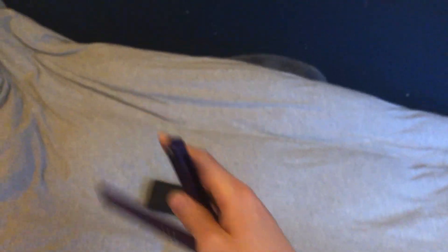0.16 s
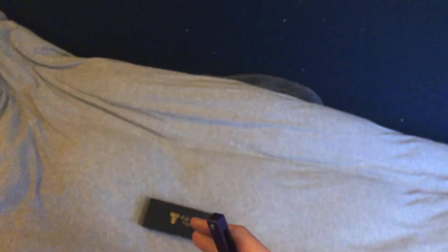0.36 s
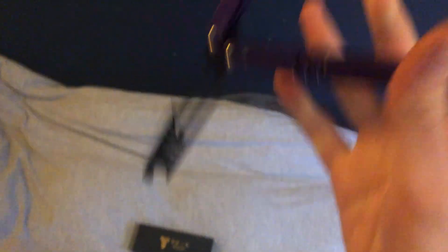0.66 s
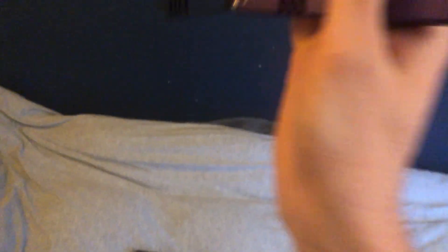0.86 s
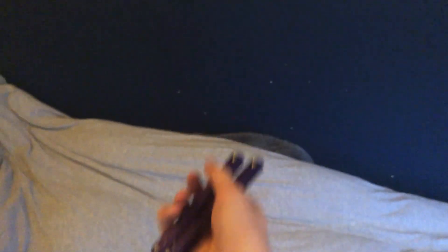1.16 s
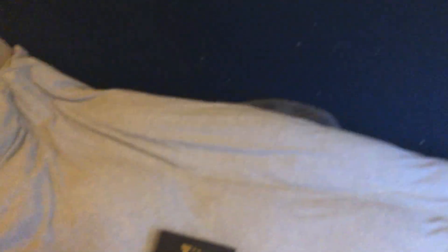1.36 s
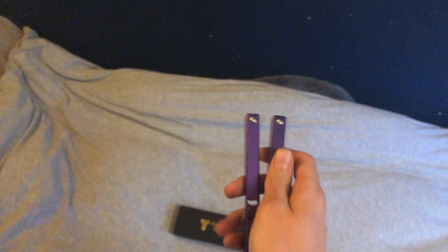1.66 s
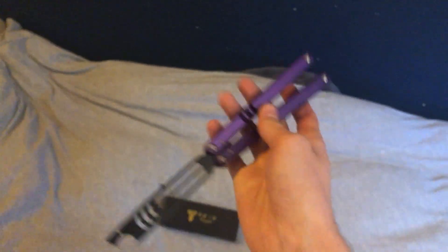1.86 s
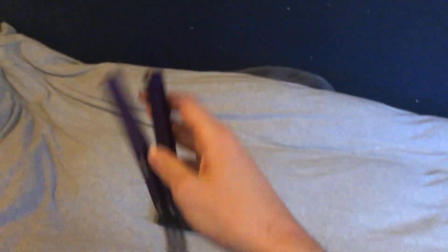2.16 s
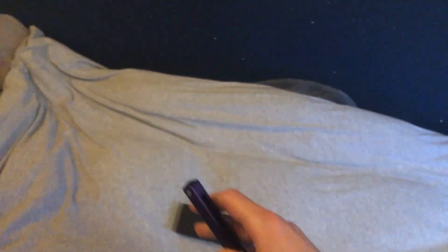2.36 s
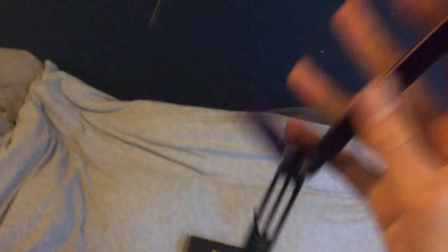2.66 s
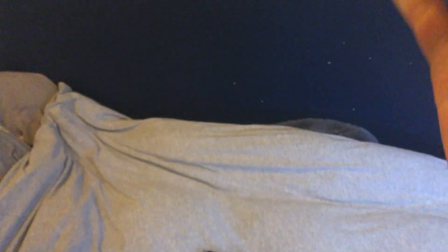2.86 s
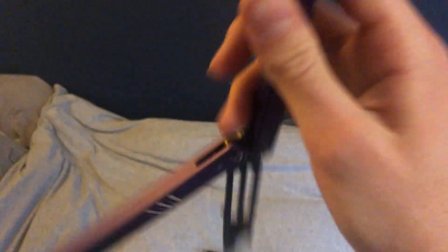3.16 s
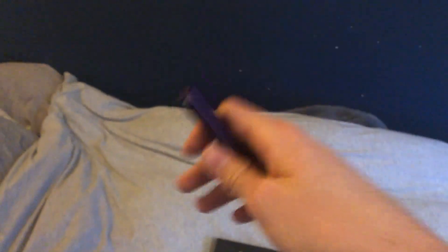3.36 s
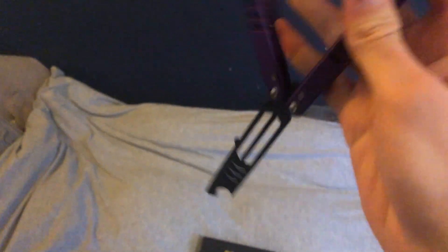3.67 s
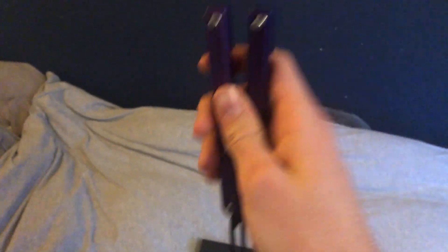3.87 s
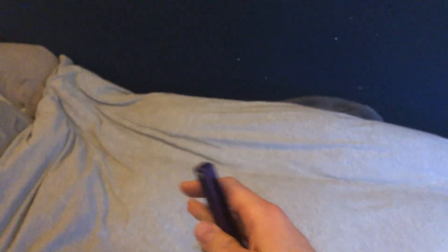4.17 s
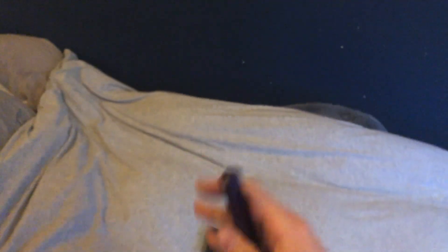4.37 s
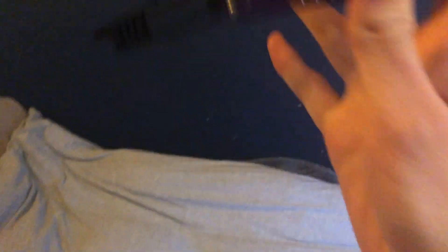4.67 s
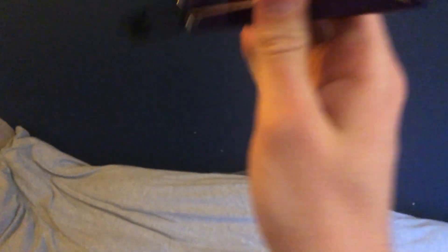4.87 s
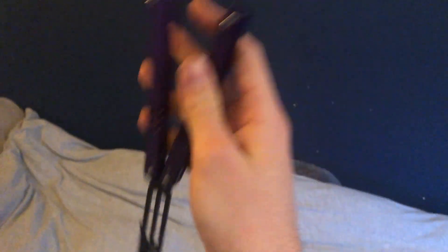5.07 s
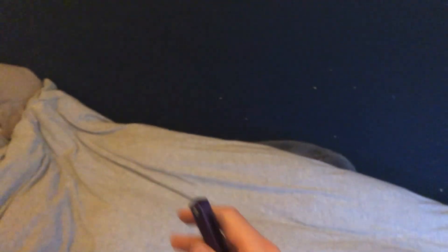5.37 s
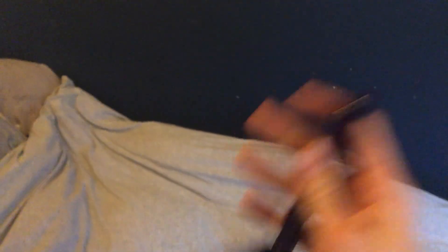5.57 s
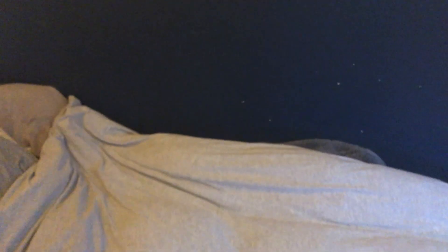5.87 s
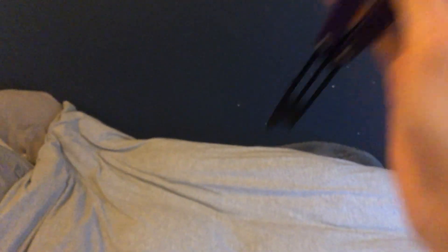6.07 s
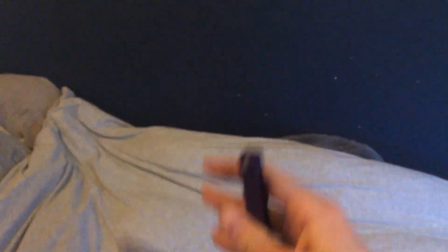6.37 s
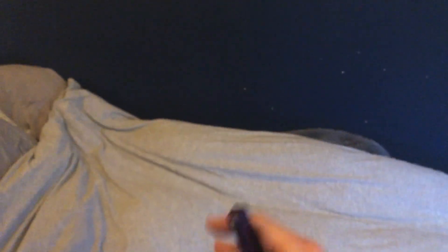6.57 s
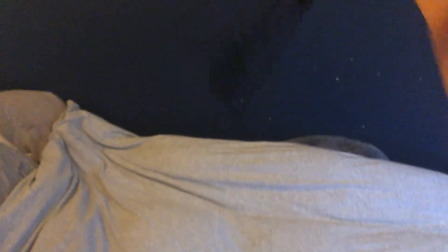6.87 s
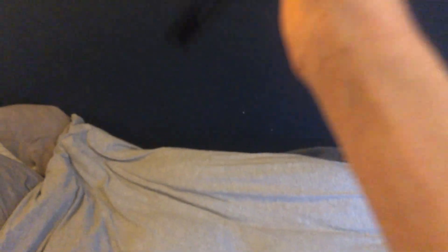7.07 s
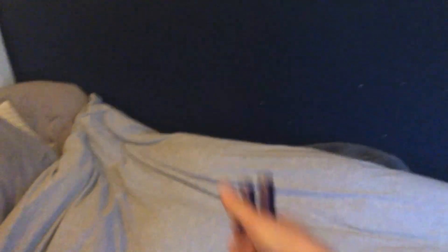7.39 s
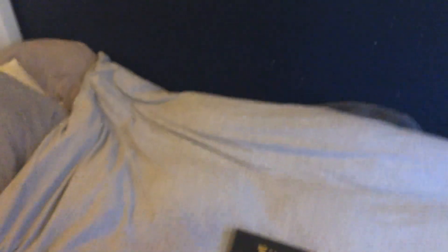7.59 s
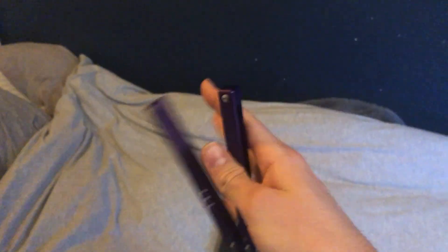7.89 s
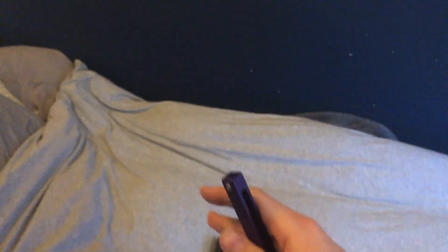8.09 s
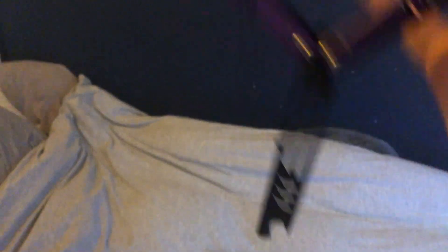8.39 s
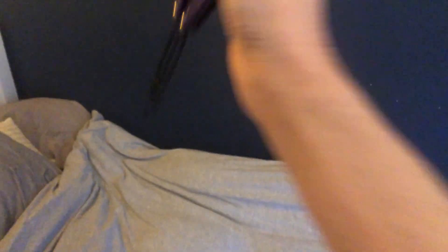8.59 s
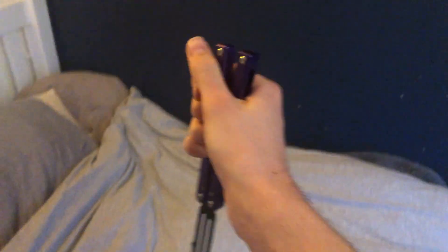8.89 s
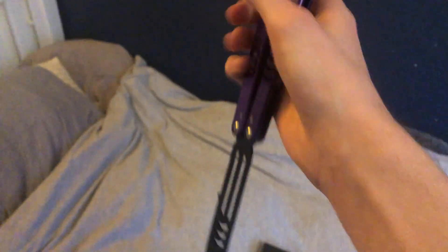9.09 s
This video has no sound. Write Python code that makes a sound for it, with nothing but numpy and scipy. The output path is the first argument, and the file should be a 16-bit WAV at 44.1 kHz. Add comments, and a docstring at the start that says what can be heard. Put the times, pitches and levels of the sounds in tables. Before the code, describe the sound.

A hinged metal trainer knife is flipped by hand close to a small microphone in a furnished bedroom, over faint rumble, hiss and a weak wavering hum. Moderate clacks at 0.3 and 0.6 seconds lead to a quick bright cluster from 0.7 to 0.95. A quieter pause follows, with soft ticks and a slight brush around 1.3 to 1.4. Two clacks near 2.5 precede a tight burst at 2.8. Single and grouped hits come at 3.6 to 3.8, 4.3 and 4.6 to 4.9, then 5.4, 5.65 and a burst at 5.8 to 5.95. After clacks at 6.45 and 6.55, a long flurry from 6.9 rattles into fast rebounds until 7.2. Light touches fill the lull. Clacks at 8.0 and 8.3 precede another hard flurry, 8.5 to 8.8, ending in chatter. Thin high ringing lingers between blows; the loudest crackle with overload. A weak clack sounds at 9.2.

```python
"""Over a low hum and soft hiss, metal clacks ring out: a butterfly-knife trainer flipped near a small microphone.
Each contact is a minimum-phase noise burst; damped sine modes add the ring of the held knife.
Two long flurries end in a chatter of rebounds; between blows come light touches, slides and faint free ringing.
A reverberant noise tail is the bedroom, and the loudest blows overload the input and clip."""
import sys
import numpy as np
from scipy import signal
from scipy.fft import rfft, irfft
from scipy.io import wavfile
from scipy.ndimage import uniform_filter1d

SR = 44100
rng = np.random.default_rng(int(sys.argv[2]) if len(sys.argv) > 2 else 0)


def output_pcm(signal):
    """Save a mono or channel-first signal as 16-bit PCM at the path in sys.argv[1].

    Samples are clipped to [-1, 1] before scaling.
    """
    pcm = np.clip(np.atleast_2d(signal).T, -1, 1) * 32767
    wavfile.write(sys.argv[1], SR, np.round(pcm).astype(np.int16))


N = 407484
TAPS = 4096  # length of one contact, in samples
SMALL_DROP = 0.02  # greatest lowering of the low modes, as a share, in rebounds and in the listed grip spans

# Spectrum of metal on metal. Each row: frequency in Hz, relative density in dB per Hz.
CLACK_SPECTRUM = [(100, -30), (1000, -24.5), (1800, -20), (2500, -8), (3300, -12), (4500, -11), (6000, -3),
                  (7000, 2.5), (7700, -1.5), (8500, -12.5), (10500, -19), (12200, -12.5), (13500, -28.5),
                  (15500, -18)]


def strikes(clack_gain_db=1.9, ring_gain_db=-0.7, vary_tilt=0.6, vary_db=1.5):
    """Impact excitation: each blow is a double clack and a modal ring that the next blow damps."""
    # Metal meets metal. Each row: start in seconds, impact in dB before gain, main ring in dB against the
    # impact (low when the fingers grip the struck part).
    blows = [(0.3438, -14, -2.5), (.5871, -12.5, -2), (.7252, -14, -11), (.7766, -3, -16),
             (0.7894, -18, 9.5), (.8259, -9, -13.5), (0.8496, -6, 4.5), (.8772, -13, 10.5),
             (0.8898, -8.5, -12), (.903, -12, 0.5), (0.9097, -3.5, -7), (0.9504, -15, -7.5),
             (1.3817, -28, -13), (1.4149, -23, -14), (1.4266, -20.5, -8), (1.7422, -32.5, -16),
             (2.153, -42, 5.5), (2.4378, -15, 3), (2.5776, -16, 1), (2.7831, -9.5, 3), (2.8037, -5, 5),
             (2.8219, -4.5, 9), (2.834, -5.5, -8.5), (2.8463, -7, 3.5), (2.8546, -13.5, 8.5),
             (2.8616, -9.5, -1), (3.617, -8, 1), (3.7956, -5.5, -8), (3.804, -14, -7), (3.8105, -4.5, -13),
             (4.2218, -34, -19), (4.2791, -26, -8), (4.2958, -10, -10), (4.5771, -3.5, 0),
             (4.6979, -15, -2.5), (4.7349, 0, -4), (4.7666, -12, 5), (4.784, -4, 1.5), (4.8008, -9, 8.5),
             (4.824, -6, 1), (4.884, -36.5, 6), (4.9165, -17.5, -16), (5.3678, -10.5, -6),
             (5.6519, -4.5, 7), (5.7935, -8.5, -4.5), (5.8189, -4, 7), (5.8394, -7.5, 15),
             (5.8549, -4.5, -9.5), (5.8724, -15, -5.5), (5.8926, -7, 10.5), (5.946, -32, -4),
             (5.9571, -8.5, -3), (6.4507, -7, -2), (6.5583, -15, 0.5), (6.9133, -8.5, -0.5),
             (6.9607, -8.5, -1.5), (6.9752, -9.5, 11.5), (6.9947, -6.5, 9), (7.0156, -5, -0.5),
             (7.0401, -4.5, 3.5), (7.0613, -4, 6.5), (7.0845, -9, 5.5), (7.0997, -7, 3), (7.1112, -2, 2.5),
             (7.9923, -16, -2), (8.2696, -12, -21.5), (8.489, -40, -16), (8.512, -5, -20), (8.5238, -12, 4),
             (8.5733, -7, 9), (8.5914, -16.5, 10.5), (8.61, -1, 0), (8.6166, -9.5, 8.5),
             (8.6296, -4.5, 11.5), (8.6497, -3, -3), (8.6705, -3.5, -5), (8.6868, -3, -2),
             (8.6996, -3.5, -4.5), (9.2075, -22.5, 1)]
    full_tilt, tilt_per_db = 3, 0.2121  # dB per octave at 0 dB impact, and its change per dB
    full_hollow_db, hollow_per_db = 1.5, 0.01  # hollow knock of the handles at 0 dB impact, change per dB
    settle_s, loose_tilt = 0.08, 2.2  # parts still loose from the last blow sound brighter (dB per octave)
    second_db, second_after_s = -8, 0.002  # the other handle lands softer, about this much later
    out = np.zeros(N)
    gaps = np.diff([row[0] for row in blows], prepend=0, append=N / SR)
    for (s, db, ring_db), before, after in zip(blows, gaps, gaps[1:]):
        place, lag, low, high = rng.uniform(-1, 1, 4)
        loose = np.exp(-before / settle_s)
        _, _, grip_tilt, drop = grip(s)
        # a harder blow is a shorter contact, hence brighter
        tilt = full_tilt + tilt_per_db * db + loose_tilt * loose + grip_tilt + vary_tilt * place
        hollow_db = full_hollow_db + hollow_per_db * db
        for delay, level_db in (0, db), (second_after_s * (1 + lag / 2), db + second_db):
            contact = clack(CLACK_SPECTRUM, tilt, hollow_db, decay=0.00086, rattle_db=-6.5, rattle_decay=0.0056)
            add(out, s + delay, amp(level_db + clack_gain_db) * contact)
        families_db = ring_levels(s, db, ring_db, loose) + vary_db * np.array([low, 0, high])
        damped = ring(families_db, drop) * caught(2 * TAPS, after, fade=0.006)
        add(out, s, amp(ring_gain_db) * damped)
    return out


def clack(spectrum, tilt, hollow_db, decay, rattle_db, rattle_decay, smoothing=0.36):
    """Broadband contact: a crack and a brief buzz of the loose pivots, filtered by a broad metallic spectrum."""
    t, hz = np.arange(TAPS) / SR, np.fft.rfftfreq(TAPS, 1 / SR)
    slope_db = tilt * np.log2(np.clip(hz, 2800, 10000) / 6000)
    knock_db = hollow_db * np.exp(-(np.log2((hz + 1) / 2250) / 0.45) ** 2)  # a hollow bump near 2250 Hz
    gain = evened(amp(read(spectrum, hz))) * amp(slope_db + knock_db)
    envelope = np.exp(-t / decay) + amp(rattle_db) * np.exp(-t / rattle_decay)
    burst = rfft(rng.standard_normal(TAPS) * envelope)
    # partly level the noise burst's random peaks and notches, for a smoother clack and denser tail
    log_gain = np.log(gain) - np.clip(smoothing, 0, 1) * np.log(evened(abs(burst)) + 1e-3)
    # minimum phase: the Hilbert transform of the log gain, mirrored to negative frequencies
    mirrored = np.r_[log_gain, log_gain[-2:0:-1]]
    causal = np.exp(np.conj(signal.hilbert(mirrored)))[:len(hz)]
    one_millisecond = np.sqrt(np.mean(gain ** 2) * SR / 1000 / TAPS)  # energy of the gain over 1 ms
    return evened(irfft(burst * causal)) * one_millisecond


def ring(families_db, drop, grip_spread=0.18, detune=0.004, place_db=4.5, rise=0.00084):
    """Modal superposition: damped sines whose pitch, damping and mix shift with grip and point of contact."""
    # Modes of the held knife, four rows a family from low to high. Each row: nominal frequency in Hz,
    # level in dB within its family, nominal decay time t60 in seconds.
    held_modes = [(2730, 0, .085), (2640, -9, .05), (2810, -10, .05), (2350, -17, .06), (7260, 0, .042),
                  (7400, -8, .03), (7110, -14, .035), (6800, -18, .04), (12265, 0, .045), (12420, -5, .04),
                  (11350, -15, .04), (15150, -12, .045)]
    t = np.arange(2 * TAPS) / SR
    hz, db, t60 = np.transpose(held_modes)[:, :, None]
    per_family = len(held_modes) // len(families_db)
    phase = rng.random(hz.shape)
    shift, place = rng.standard_normal((2, *hz.shape))
    weaker = db < db.max() - 2  # each family's strongest mode stays put
    level_db = db + np.repeat(families_db, per_family)[:, None] + place_db * place * weaker
    lowered = np.repeat([1 - drop * rng.random(), 1, 1], per_family)[:, None]  # the low family only
    hz = hz * lowered * (1 + detune * shift)
    damping = np.exp(grip_spread * (2 * rng.random() - 1))
    decay = np.exp(-np.log(1000) * damping * t / t60)
    modes = amp(level_db) * decay * np.sin(2 * np.pi * (hz * t + phase))
    return modes.sum(0) * (1 - np.exp(-t / rise))


def ring_levels(s, db, ring_db, loose):
    """Modal excitation: levels of the low, main and high mode family after a blow, in dB."""
    low_ring_db, low_per_db = -23.5, 1.81  # low family at 0 dB impact, and its change per dB
    high_ring_db, high_share = -20, 0.5  # high family against the impact; how far it follows the main ring
    loose_high_db = 8.5  # parts still loose from the last blow give more high ring
    low_db, high_db, _, _ = grip(s)
    return [low_ring_db + low_per_db * db + low_db,
            db + ring_db,
            db + high_ring_db + high_share * ring_db + loose_high_db * loose + high_db]


def grip(s):
    """Boundary conditions: what the grip adds to low ring, high ring and tilt; how far it may lower low modes."""
    # Time spans, in flurries and around some single or soft clacks, where ring balance and brightness differ.
    # Each row: start in seconds, end in seconds, low family in dB, high family in dB,
    # brightness in dB per octave.
    grips = [(.70, .74, 15, 8.5, -3.5), (.74, .87, 1, 5, -1), (.87, .96, 5, 8, 0),
             (1.35, 1.46, -3, -15.5, -3), (2.75, 2.9, 13.5, 2, 0.8), (3.77, 3.85, -3, 0, 2),
             (4.2, 4.31, -2, -9, -2), (4.67, 4.86, 2, 8, 0), (5.77, 5.88, 11.5, -7.5, 1.5),
             (5.88, 5.99, 16.5, -5.5, -0.5), (6.89, 7.05, 11, 6.5, 0), (7.05, 7.115, -1, -3, -1.5),
             (8.50, 8.68, 11, 7.5, -1.5)]
    for start, end, low_db, high_db, tilt in grips:
        if start <= s < end:
            return low_db, high_db, tilt, SMALL_DROP
    return 0, 0, 0, 0.15  # outside these spans: low modes up to 15 percent lower


def caught(size, after, fade):
    """Contact damping: envelope of a ring that a touch stops, fading exponentially from then on."""
    return np.exp(-np.maximum(np.arange(size) / SR - after, 0) / fade)


def chatter(spread_db=1.5, jitter_s=0.0013):
    """Repeated rebound: the handles bounce on their pins at shrinking intervals."""
    # Each row: start in seconds, end in seconds, first impact in dB, last impact in dB,
    # first gap in seconds, last gap in seconds.
    rebounds = [(7.116, 7.186, -9.5, -7.5, .005, .003), (7.1186, 7.178, -3.5, -4, .0113, .0108),
                (7.187, 7.226, -6.5, -22, .0045, .003), (8.7103, 8.755, -1, -4, .007, .003),
                (8.757, 8.78, -4.5, -11.5, .0045, .003)]
    # Spectrum of a rebound. Each row: frequency in Hz, relative density in dB per Hz.
    rebound_spectrum = [(100, -31), (1800, -24.5), (2650, -11.5), (3000, -10.5), (3500, -9), (4250, -4),
                        (5200, -4.5), (6000, -6.5), (6800, 8), (7300, -0.5), (8300, -6), (10500, -13.5),
                        (12000, -3), (12400, -10), (13500, -23.5), (15500, -15.5)]
    rebound_ring_db = -7  # main ring against the impact
    out = np.zeros(N)
    for start, end, first_db, last_db, first_gap, last_gap in rebounds:
        s = start
        while s < end:
            db = np.interp(s, [start, end], [first_db, last_db]) + spread_db * rng.standard_normal()
            gap = max(np.interp(s, [start, end], [first_gap, last_gap]), 1 / 1000)
            at = s + jitter_s * rng.uniform(-1, 1)
            contact = clack(rebound_spectrum, 0, 0, decay=0.0013, rattle_db=-8, rattle_decay=0.005)
            add(out, at, amp(db) * contact)
            families_db = ring_levels(s, db, rebound_ring_db, loose=0.93)
            add(out, at, ring(families_db, SMALL_DROP) * caught(2 * TAPS, gap, fade=0.0055))
            s += gap
    return out


def touches(tick_gain_db=-9, tilt=-7.5, hollow_db=4, ping_gain_db=-1, ping_t60=0.06):
    """Gentle excitation: a handle just touches the blade, a dull tick and a short one-mode ping."""
    # Each row: start in seconds, tick in dB before gain, ping frequency in Hz, ping in dB before gain.
    light_touches = [(2.2483, -38.5, 2530, -54), (4.064, -38, 2730, -67), (4.122, -39.5, 2450, -60),
                     (4.1627, -47, 2370, -50), (5.1489, -39, 2580, -44), (5.2255, -44, 2530, -48),
                     (5.2802, -35.5, 2690, -65), (6.119, -34.5, 2650, -48), (6.3644, -40.5, 2530, -58),
                     (6.853, -35.5, 2430, -52.5), (7.6854, -31.5, 2540, -52), (7.8486, -45.5, 2640, -55),
                     (8.4494, -37, 2040, -59.5), (9.1127, -38, 2420, -73)]
    out, t = np.zeros(N), np.arange(TAPS) / SR
    for s, tick_db, hz, ping_db in light_touches:
        tick = clack(CLACK_SPECTRUM, tilt, hollow_db, decay=0.0011, rattle_db=-6, rattle_decay=0.005)
        ping = np.exp(-np.log(1000) * t / ping_t60) * np.sin(2 * np.pi * hz * t)
        add(out, s, amp(tick_db + tick_gain_db) * tick)
        add(out, s, amp(ping_db + ping_gain_db) * ping)
    return out


def blade_singing():
    """Free vibration: the swinging blade sings at a single mode until it is caught."""
    # Each row: start in seconds, moment caught in seconds, level in dB of the direct tone.
    blade_rings = [(.911, 1.28, -48), (2.577, 2.73, -56), (2.847, 3.125, -48), (3.811, 4.2, -52),
                   (4.295, 4.57, -60.5), (4.825, 5.26, -55), (5.892, 6.33, -50), (6.558, 6.9, -64),
                   (7.172, 7.6, -54.5), (8.27, 8.42, -57), (8.744, 9.12, -46.5)]
    return singing(blade_rings, hz=5022, t60=1.7, sway=0.8, doppler_hz=17)


def handle_singing():
    """Free vibration: a loose handle sings likewise, higher and with a faster decay."""
    # Each row: start in seconds, moment caught in seconds, level in dB of the direct tone.
    handle_rings = [(.344, .49, -50), (2.438, 2.78, -36.5), (3.811, 3.98, -61), (4.295, 4.58, -32.5),
                    (5.367, 5.56, -51), (6.558, 6.80, -40.5), (8.270, 8.48, -39.5)]
    return singing(handle_rings, hz=6800, t60=0.53, sway=0.4, doppler_hz=13)


def singing(rows, hz, t60, sway, doppler_hz):
    """Beating: the Doppler-shifted reflections of a moving part interfere with its direct tone."""
    out, t = np.zeros(N), np.arange(SR) / SR
    for s, caught_s, db in rows:
        shift, phase = rng.random((2, 4, 1))  # four reflections
        echo_hz = hz + doppler_hz * (2 * shift - 1)
        echoes = np.sin(2 * np.pi * (echo_hz * t + phase)).sum(0) / 2
        envelope = np.exp(-np.log(1000) * t / t60) * caught(SR, caught_s - s, fade=0.024)
        add(out, s, amp(db) * envelope * (np.sin(2 * np.pi * hz * t) + sway * echoes))
    return out


def hand(sag=0.008, skin_octaves=1.1):
    """Friction and soft impact: skin brushes give band noise; a landing on the palm gives a falling thump."""
    # The knife slides or knocks against the fingers. Each row: start in seconds, length in seconds,
    # level in dB, centre frequency in Hz.
    slides = [(1.281, 0.11, -59, 5800), (1.296, 0.0091, -43.5, 1130), (3.209, .07, -59, 9400),
              (3.758, .016, -52, 600), (5.02, 0.074, -66, 8700)]
    # A handle lands on the palm. Each row: start in seconds, level in dB, first and last frequency in Hz.
    pats = [(3.762, -39, 648, 65.5)]
    out = np.zeros(N)
    wide = 2 ** skin_octaves
    for s, length, db, hz in slides:
        size = int(length * SR)
        spectrum = [(hz / wide ** 3, -22), (hz / wide, -5), (hz, 0), (hz * wide, -11), (hz * wide ** 3, -40)]
        brush = noise(spectrum, size) * np.hanning(size)
        add(out, s, amp(db) * evened(brush))
    t = np.arange(TAPS) / SR
    for s, db, first_hz, last_hz in pats:
        turns = np.cumsum(last_hz + (first_hz - last_hz) * np.exp(-t / sag)) / SR
        swell = np.exp(-((turns - 4.6) / 2.5) ** 2)  # loudest after 4.6 cycles
        add(out, s, amp(db) * swell * np.sin(2 * np.pi * turns))
    return out


def pivot_play(per_s=9, db=-61, spread_db=3):
    """Random point process: faint ticks of the loose pivots as the fingers shift."""
    out = np.zeros(N)
    candidates = 200
    for s, chance, size, colour in rng.random((candidates, 4)):
        if chance < per_s * N / SR / candidates:
            level_db = db + spread_db * min(-np.log(size), 2)
            tick = clack(CLACK_SPECTRUM, -4 * colour, 8 * colour, decay=0.001, rattle_db=-15, rattle_decay=0.004)
            add(out, s * N / SR, amp(level_db) * tick)
    return out


def room(x, gap=0.0035, swell=0.0054, near=0.87):
    """Reverberation: the dense reflections of a small furnished room, each band with its own decay time."""
    # Each row: frequency in Hz, decay time t60 in seconds.
    room_t60 = [(300, 0.26), (1300, 0.18), (2700, 0.27), (5000, 0.27), (7200, 0.23), (12000, 0.093),
                (16000, 0.083)]
    # Tone of the tail. Each row: frequency in Hz, gain in dB.
    room_colour = [(200, -4), (1200, 0.5), (2500, -1.5), (5000, -3.5), (7200, -4), (12000, 2.5),
                   (16000, -5.5)]
    delay = np.arange(SR // 2) / SR
    build_up = np.clip((delay - gap) / swell, 0, 1)  # far walls answer later
    reflections = rng.standard_normal(len(delay)) * (near + (1 - near) * build_up) * (delay > gap)
    hz, t, bands = signal.stft(reflections, SR, nperseg=256)
    decay = np.exp(-np.log(1000) * t / read(room_t60, hz)[:, None])
    tail = signal.istft(bands * decay, SR, nperseg=256)[1]
    tail = tail / np.linalg.norm(tail)
    tail = irfft(rfft(tail) * amp(read(room_colour, np.fft.rfftfreq(len(tail), 1 / SR))))
    return signal.fftconvolve(x, tail)[:N]


def background(hum_hz=129.7, waver_hz=6, floor_db=-56):
    """Stationary noise and frequency modulation: rumble and hiss, with a wavering hum that swells and recedes."""
    # Spectrum of rumble and hiss. Each row: frequency in Hz, relative density in dB per Hz.
    floor_spectrum = [(20, -33), (35, -11.5), (55, 2), (95, -13), (150, -1), (200, -6.5), (380, -9),
                      (800, -21), (2300, -29.5), (2600, -27), (2900, -30.5), (5500, -29.5), (9000, -33),
                      (15500, -42.5)]
    # Each row: time in seconds, level of the hum in dB.
    hum_levels = [(0, -72), (.8, -67), (1.5, -58.5), (2.5, -60.5), (3.6, -62), (4.2, -73.5), (9.2, -78)]
    t = np.arange(N) / SR
    drift = evened(uniform_filter1d(rng.standard_normal(N), size=4000))
    hum = evened(np.sin(2 * np.pi * np.cumsum(hum_hz + waver_hz * drift) / SR))
    hum_db = np.interp(t, *np.transpose(hum_levels))
    return amp(floor_db) * noise(floor_spectrum, N) + amp(hum_db) * hum


def noise(spectrum, size):
    """Spectral shaping: white noise filtered to a spectrum, at rms 1."""
    white = rfft(rng.standard_normal(size))
    return evened(irfft(white * amp(read(spectrum, np.fft.rfftfreq(size, 1 / SR))), size))


def amp(db):
    """Logarithmic level: decibels to amplitude gain."""
    return 10 ** (np.asarray(db) / 20)


def evened(x):
    """Power normalisation: scales to rms 1."""
    return x / np.sqrt(np.mean(x ** 2) + 1e-20)


def read(points, hz):
    """Interpolation on a logarithmic frequency axis."""
    f, value = np.transpose(points)
    return np.interp(np.log(hz + 1), np.log(f + 1), value)


def add(mix, s, sound):
    """Linear superposition: mixes a sound in at s seconds."""
    part = mix[max(round(s * SR), 0):][:len(sound)]
    part += sound[:len(part)]


def scene():
    """Superposition of the close knife, its room, the free ringing and the background."""
    knife = strikes() + chatter() + touches() + pivot_play() + hand()
    free_ringing = blade_singing() + handle_singing()
    return (knife + amp(-9.0) * room(knife) + free_ringing + background())[None]


def record(dry):
    """Overload and filtering: clipping at full scale at 48 kHz folds overtones down; then tone and band limit."""
    # Tone of the recorder, a mild bass cut. Each row: frequency in Hz, gain in dB.
    recorder_tone = [(20, -10.5), (50, -2), (300, -2.5), (900, -2.5), (2000, -1.5), (8000, -0.5),
                     (15000, 0)]
    edge_hz = 15720  # upper band limit
    fast = signal.resample_poly(dry, 160, 147, axis=1)  # 44.1 to 48 kHz
    clipped = signal.resample_poly(np.clip(fast, -1, 1), 147, 160, axis=1)[:, :N]
    toned = irfft(rfft(clipped) * amp(read(recorder_tone, np.fft.rfftfreq(N, 1 / SR))), N)
    low_pass = signal.firwin(511, edge_hz, window=("kaiser", 8), fs=SR)
    return signal.oaconvolve(toned, low_pass[None], "same")


dry = scene()
out = record(dry)
output_pcm(out)
```